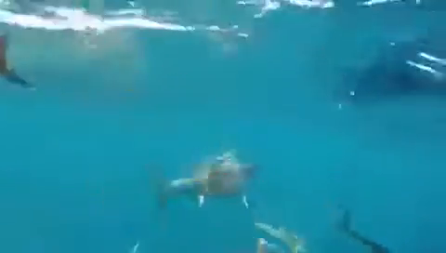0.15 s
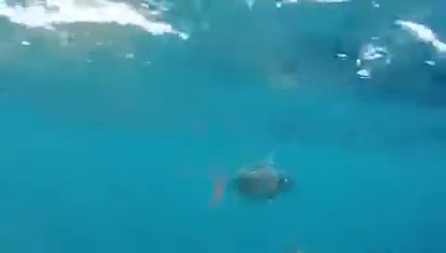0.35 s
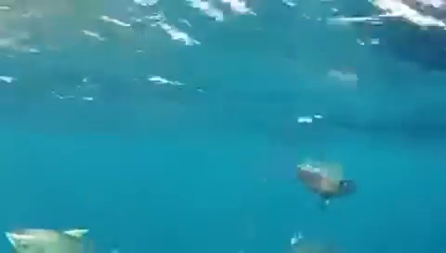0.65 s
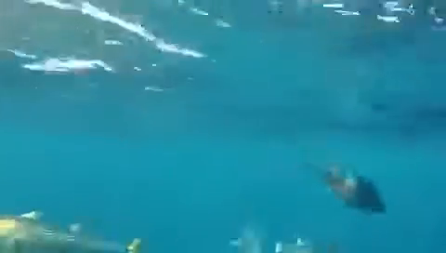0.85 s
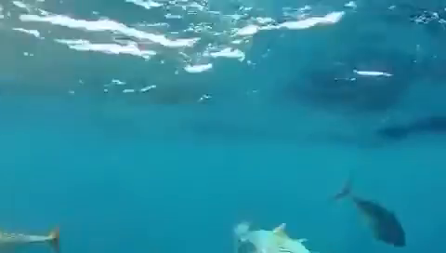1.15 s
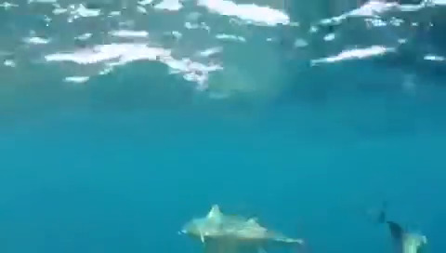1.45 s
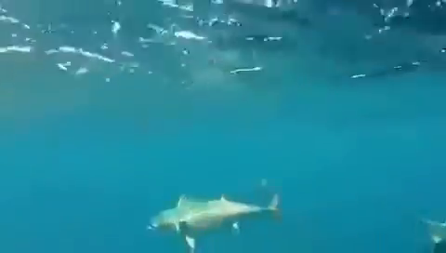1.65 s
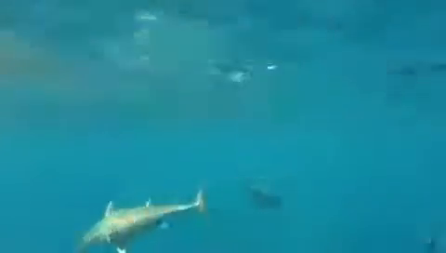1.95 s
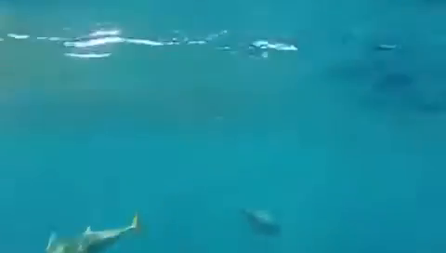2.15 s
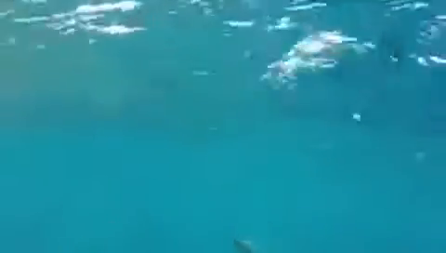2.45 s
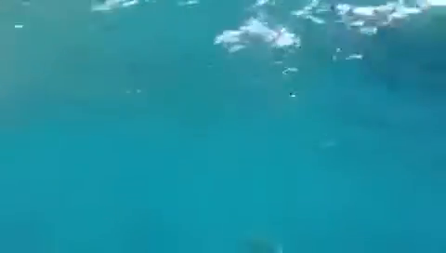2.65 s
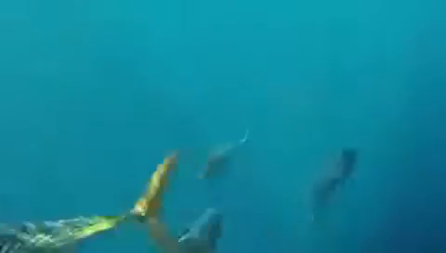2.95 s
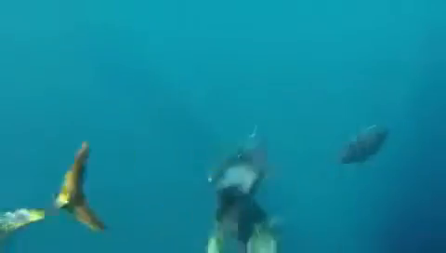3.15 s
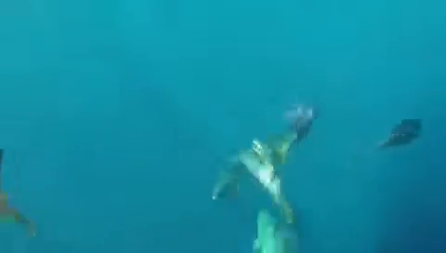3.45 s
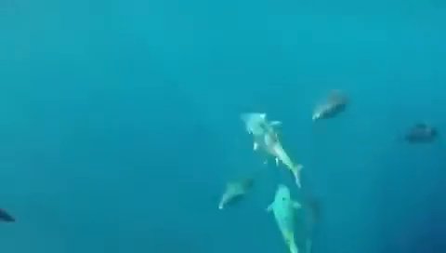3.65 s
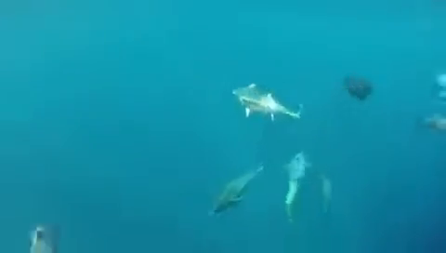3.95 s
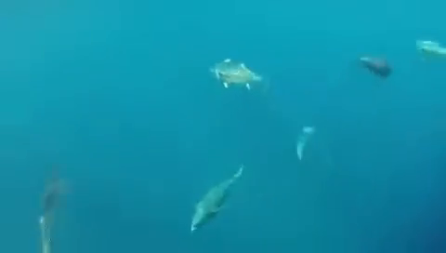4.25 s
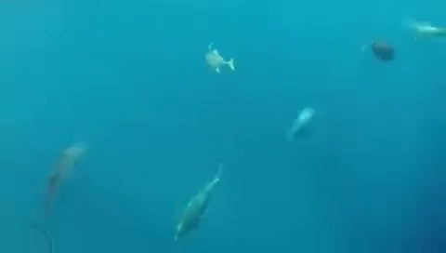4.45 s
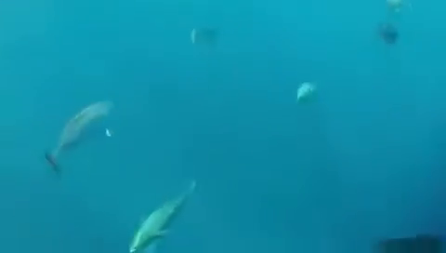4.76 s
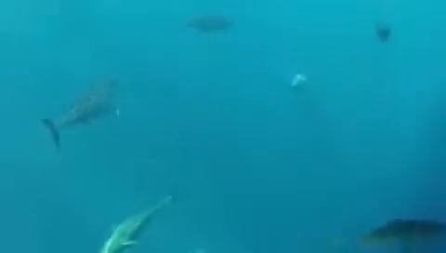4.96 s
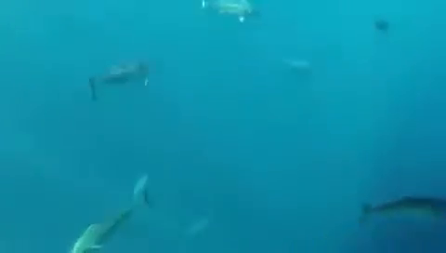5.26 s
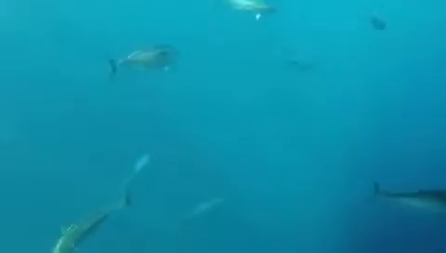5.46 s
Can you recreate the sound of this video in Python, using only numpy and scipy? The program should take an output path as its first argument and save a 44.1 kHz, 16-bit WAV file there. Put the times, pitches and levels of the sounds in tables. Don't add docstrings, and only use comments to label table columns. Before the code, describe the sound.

Underwater, a diesel boat engine drones and throbs with hissing propeller wash, knocks hit the camera housing, then the drone jumps louder and closer.

```python
import sys
import numpy as np
from scipy import signal
from scipy.fft import rfft, irfft
from scipy.io import wavfile
from scipy.ndimage import uniform_filter1d

SR = 44100
rng = np.random.default_rng(int(sys.argv[2]) if len(sys.argv) > 2 else 0)


def generate_wav(sig):
    pcm = np.round(np.clip(np.atleast_2d(sig).T, -1, 1) * 32767).astype(np.int16)
    wavfile.write(sys.argv[1], SR, pcm)


def to_linear_factor(level_db):
    exponent = np.asarray(level_db, float) / 20
    return 10 ** exponent


N = 246959
RECORDER_HZ = 12000
M = N * RECORDER_HZ // SR + 1
CUT_S, FADE_OUT_S, FADE_IN_S = 3.011, 0.12, 0.087
CYCLE_HZ = 25.823
TICK_HZ, TICK_MS, SNAP_HZ, SNAP_MS, CLICK_SCATTER = 5160, 1.3, 4150, .35, .022

ZONE_HZ = [140, 390, 720, 980]
ZONE_DB = [(-49, -48, -48, -53), (-41, -35, -41.5, -48)]
ZONE_FOLLOW = [(.3, 1.05, 0.56, 0.62), (.4, 1.1, 0.92, 0.066)]
# time in seconds, level in dB.
NEAR = [
    [(.02, -51), (.3, -48.5), (.6, -47.5), (1.05, -47.5), (1.55, -49.5), (2.05, -51.5), (2.4, -52.5),
     (2.65, -49), (2.9, -46)],
    [(3.12, -40.5), (3.4, -40), (3.8, -38), (4.15, -36), (4.4, -34), (4.7, -33.5), (5.0, -33), (5.3, -31.5),
     (5.58, -32)],
]

# frequency in Hz, density in dB per Hz.
FIZZ = [(3900, -8.5), (4400, -5.5), (5200, -5), (5600, -6.5), (5990, -12)]
FLOW_DB = (-70.5, -61)
# time in seconds, rise over calm in dB, half length in seconds.
SURGES = [
    (.22, 7, 0.074),
    (.63, 7, .09),
    (1.18, 9, 0.16),
    (1.7, 10, 0.3),
    (2.0, 4, .06),
    (2.26, 5, .04),
    (2.68, 5, .2),
    (4.68, 6, 0.14),
    (5.1, 9, .13),
    (5.53, 10, 0.079),
]
# start in seconds, level in dB, pitch in Hz, 60 dB decay in seconds, rise in seconds.
KNOCKS = [(1.071, -31, 360, 0.05, 0.0031), (1.098, -31, 174, 0.074, 0.0047),
          (1.099, -30.5, 363, 0.11, .004), (1.100, -39, 55, .12, 0.0067),
          (1.110, -31.5, 365, 0.041, 0.0028), (1.12, -31, 110, 0.03, 0.0025), (1.102, -38, 603, .05, .003),
          (1.108, -45, 1300, .04, .003), (1.128, -31, 415, 0.034, 0.0031), (1.132, -43, 186, 0.067, 0.0023),
          (2.4465, -26, 646, 0.016, 0.0013), (2.448, -35.5, 1016, 0.035, .002),
          (2.452, -43, 1280, 0.037, 0.004), (2.472, -42, 2850, 0.023, .003),
          (2.556, -36, 1670, 0.024, 0.0013), (2.557, -32.5, 1333, 0.055, 0.0022),
          (3.716, -42, 2870, .03, .002), (4.195, -37, 1650, 0.05, 0.0032)]
# time in seconds, peak in dB.
TICKS = [(1.3478, -53), (1.672, -59), (1.6844, -63), (1.701, -63), (1.717, -51.5), (1.721, -57),
         (1.7264, -63), (1.7459, -62), (1.7724, -53), (1.8008, -66), (1.81, -60), (1.8204, -63),
         (1.9036, -66), (1.9116, -65), (1.92, -66), (1.9264, -66)]
# time in seconds, peak in dB.
SNAPS = [(0.3224, -71), (1.3114, -66), (1.3658, -52), (1.4127, -70), (1.4471, -66.5), (2.0642, -62),
         (2.3134, -62), (2.4154, -63.5), (2.4643, -69), (3.1544, -69), (3.455, -63), (3.5014, -69),
         (3.885, -57), (3.8964, -64), (3.913, -56), (3.9344, -72), (4.1784, -62), (4.43, -65)]

# frequency in Hz, density in dB per Hz.
WASH_LOW = [(41, -33), (70, -13.5), (113, 0.5), (232, -3.5), (269, -6), (315, -2), (354, -5), (424, -3.5),
            (552, -4), (620, 2), (775, -3.5), (880, -23.5), (1140, -45), (1940, -120)]
# frequency in Hz, density in dB per Hz.
WASH_HIGH = [
    [(2300, -5), (2540, -19), (2680, 0), (2800, -3.5), (2980, 0), (3200, -5.5), (3600, -10.5), (3740, -20),
     (3830, -2), (3930, -1), (4010, -7.5), (4120, -9.5), (4400, -22), (5000, -39)],
    [(1480, -32), (2520, -2), (3000, 0), (3490, -12.5), (3870, -6.5), (4370, -20.5), (4600, -20.5),
     (5980, -52), (10100, -120)],
]
# frequency in Hz, density in dB per Hz.
GEAR = [
    [(520, -46), (880, -9.5), (1060, -10.5), (1100, -17.5), (1110, -14), (1190, -23), (1250, -8),
     (1340, -2), (1420, -4.5), (1570, -13.5), (1730, -13.5), (1840, -1), (1920, -0.5), (2000, -5),
     (2520, -19), (3280, -56), (5540, -120)],
    [(520, -33), (880, -3.5), (924, -7), (974, -8.5), (1000, -5.5), (1060, -3.5), (1110, -15.5),
     (1160, -16.5), (1350, 4), (1700, -11.5), (1870, 4), (2030, -10), (2220, -8.5), (2300, -15),
     (2520, -20), (3280, -48), (5540, -120)],
]
# gearbox level in dB, treble level in dB, both above the low wash.
WASH_DB = [(-0.5, -12), (-3.5, -14)]

ORDER_DB = [
    [-13, -14, -15, -5, -9, -20.5, -7, -6, -17, -9.5, -1.5, -7, -3.5, 0, -8.5, -3.5, -5, -17, -8, -17, -14,
     -16.5, -9, -2, -10, -8.5, -4, -8.5, -25, -7, -12, -18, -20],
    [-17, -24, -27, -1, -6, -13.5, -10, -3, -11.5, -5, -2.5, -14, -6, 0.0025, -9.5, -1, -13, -14, -17,
     -11.5, -26, -16, -16.5, -2.5, -18.5, -11.5, -14.5, -11.5, -16, -5.5, -14.5, -16.5, -19],
]
TOP_ORDER_DB = (-53.5, -42.5)
LEAD_ORDERS = (4, 5, 8, 30, 28, 40, 73)
LEAD_DB = [(-58.5, -63, -58, -59, -68, -70.5, -65), (-48, -48, -51.5, -48, -56.5, -61.5, -65)]
# time in seconds, multiple, change in dB, half length in seconds.
SWELLS = [(0.87, 28, 13, .28), (.64, 4, 5, 0.22), (2.02, 4, -6, .2), (2.64, 4, -13, .12), (4.4, 4, 5, .2),
          (4.887, 4, 7.5, .11), (2.55, 28, 8, .12), (1.23, 5, -8, 0.13), (2.2, 5, 6.5, 0.18),
          (3.14, 5, -10, .11), (4.5, 5, -11.5, .16), (5.17, 40, 5.5, .4), (0.66, 73, 9, 0.35),
          (5.11, 5, -4, .12), (5.55, 5, 4, .14), (.05, 8, -15, 0.11), (0.98, 8, 4, 0.1), (1.7, 8, -11, 0.1),
          (2.1, 8, -5, 0.18), (2.64, 8, -12, 0.14), (3.55, 8, -11, .15), (4.42, 8, 13.5, 0.089),
          (4.9, 8, 14, 0.13), (5.45, 8, 11.5, 0.2), (0.54, 30, -11, .16), (1.23, 30, -6, 0.11),
          (2.66, 30, 4.5, 0.12), (3.82, 30, 4.5, 0.13), (4.58, 30, -18.5, 0.17), (5.33, 30, -8, 0.099)]
# frequency in Hz, level in dB.
GEAR_LINES = [
    [(1034, -71.5), (1061, -69.5), (1367, -66), (1884, -60.5), (1911, -65.5), (1965, -66), (2040, -69),
     (2143, -72), (2169, -71)],
    [(1034, -60.5), (1061, -64), (1367, -62), (1879, -59), (1911, -60), (1986, -66), (2040, -63.5),
     (2143, -64.5), (2196, -66.5)],
]
GEAR_TOP_DB = (-69.5, -68.0)


def colour(points, hz):
    f, db = np.transpose(points)
    return np.interp(np.log(hz + 1e-9), np.log(f), db, -80, -80)


def noise(gain):
    f = np.fft.rfftfreq(M, 1 / RECORDER_HZ)
    x = irfft(rfft(rng.standard_normal(M)) * gain(f), M)
    return x / x.std()


def walk(rate):
    k = int(RECORDER_HZ / rate)
    steps = np.repeat(rng.standard_normal(M // k + 1), k)
    return 1.315 * uniform_filter1d(uniform_filter1d(steps, k), k)[:M]


def by_shot(pair, t):
    first, second = np.asarray(pair, float)[..., None]
    return np.where(t < CUT_S, first, second)


def bumps(rows, t):
    total = 0
    for s, db, half in rows:
        same_shot = (t < CUT_S) == (s < CUT_S)
        total = total + db * np.exp(-.5 * ((t - s) / half) ** 2) * same_shot
    return total


def hull(t):
    first, second = (np.interp(t, *np.transpose(rows)) for rows in NEAR)
    mean_db = [np.mean(rows, axis=0)[1] for rows in NEAR]
    near_db = np.where(t < CUT_S, first, second) - by_shot(mean_db, t)
    return by_shot(ZONE_DB, t) + by_shot(ZONE_FOLLOW, t) * near_db


def heard(zones_db, hz):
    place = np.interp(np.log(hz), np.log(ZONE_HZ), np.arange(4))
    k = min(int(place), 2)
    return (k + 1 - place) * zones_db[k] + (place - k) * zones_db[k + 1]


def fizz():
    return to_linear_factor(-78.0 + 1.7 * walk(18)) * noise(lambda f: to_linear_factor(colour(FIZZ, f)))


def flow(t):
    rumble = noise(lambda f: (f / 24) ** 2 / (1 + (f / 24) ** 3.1) / (1 + (f / 85) ** 6))
    return rumble * to_linear_factor(by_shot(FLOW_DB, t) + bumps(SURGES, t) + 1.5)


def knock(out, s, db, hz, t60, rise):
    t = np.arange(int(t60 * RECORDER_HZ)) / RECORDER_HZ
    onset = np.sin(np.pi / 2 * np.clip(t / rise, 0, 1)) ** 2
    ring = -to_linear_factor(db - 60 * t / t60) * onset * np.sin(2 * np.pi * hz * t)
    i = int(s * RECORDER_HZ)
    out[i:i + len(t)] += ring


def housing():
    out = np.zeros(M + RECORDER_HZ)
    for row in KNOCKS:
        knock(out, *row)
    t = np.arange(-60, 60) / RECORDER_HZ
    clicks = [(*row, TICK_HZ, TICK_MS) for row in TICKS]
    clicks += [(*row, SNAP_HZ, SNAP_MS) for row in SNAPS]
    for (s, db, hz, ms), stray in zip(clicks, rng.standard_normal(len(clicks))):
        hz = hz * (1 + CLICK_SCATTER * stray)
        tick = to_linear_factor(db - 1.0) * np.exp(-.5 * (t * 1000 / ms) ** 2) * np.sin(2 * np.pi * hz * t)
        snap = to_linear_factor(db + 2.0) * np.exp(-.5 * (t / 0.00023) ** 2) * np.sin(2 * np.pi * 4100 * t)
        i = int((s + .002) * RECORDER_HZ)
        out[i - 60:i + 60] += tick + snap
    return out[:M]


def wash(t, phase, zones_db):
    out, swell, rattle = 0, walk(3.38), walk(25)
    throb = np.cos(2 * phase) + 0.63 * np.cos(phase)
    f = np.fft.rfftfreq(M, 1 / RECORDER_HZ)
    spectra = []
    for gear, treble, (gear_db, treble_db) in zip(GEAR, WASH_HIGH, WASH_DB):
        low = to_linear_factor(colour(WASH_LOW, f))
        spectra.append(low + to_linear_factor(colour(gear, f) + gear_db) + to_linear_factor(colour(treble, f) + treble_db))
    for hz in 80 * 2 ** (np.arange(19) / 3):
        share = np.clip(1 - np.abs(3 * np.log2((f + 1e-9) / hz)), 0, 1) ** .5
        early, later = irfft(rfft(rng.standard_normal(M)) * share * np.array(spectra), M)
        high = min(hz / 2500, 1)
        db = heard(zones_db, hz) + 0.71 * swell + (1.0 + 0.45 * high) * walk(12)
        db = db + high * (0.97 * throb + 0.67 * rattle)
        out = out + to_linear_factor(db + 8.0) * np.where(t < CUT_S, early, later)
    return out


def crank():
    return 2 * np.pi * np.cumsum(CYCLE_HZ * (1 + .0006 * walk(4))) / RECORDER_HZ


def engine(t, phase, zones_db):
    leads_db = by_shot(LEAD_DB, t)
    late = t >= CUT_S
    early_mean, late_mean = (zones_db[:, part].mean(1)[:, None] for part in (~late, late))
    drift_db = zones_db - np.where(late, late_mean, early_mean)
    gears = [{round(hz / CYCLE_HZ): db for hz, db in lines} for lines in GEAR_LINES]
    out = np.zeros(M)
    for k in range(3, 96):
        hz, slow, quick, sway = k * CYCLE_HZ, walk(2.976), walk(11), walk(5)
        scatter, stray = rng.standard_normal(2)
        if k in LEAD_ORDERS:
            swells = [(s, db, half) for s, order, db, half in SWELLS if round(order) == k]
            db = leads_db[LEAD_ORDERS.index(k)] + bumps(swells, t) + 3.0 + 1.0 * quick
        elif k <= len(ORDER_DB[0]):
            below_db = by_shot([row[k - 1] for row in ORDER_DB], t)
            db = below_db + by_shot(TOP_ORDER_DB, t) + 2.5 + heard(drift_db, hz)
            db = db + np.clip(.9 - 0.18 * below_db, 0, 3.2) * slow + 1.4 * quick
        else:
            tones_db = [gear.get(k, colour(shape, hz) + top_db + 2.1 * scatter) + 3.0
                        for gear, shape, top_db in zip(gears, GEAR, GEAR_TOP_DB)]
            depth_db = 1.8 if k in gears[1] else 2.8
            db = by_shot(tones_db, t) + heard(drift_db, hz) + depth_db * slow + 1.8 * quick
        start = (np.pi / 2 - .036) * k * k + 1.1 * stray
        out += to_linear_factor(db) * np.sin(k * phase + start + (0.23 + 0.00013 * k * k) * sway)
    return out


def scene():
    t = np.arange(M) / RECORDER_HZ
    zones_db = hull(t)
    phase = crank()
    near_sounds = fizz() + flow(t) + housing()
    ship = wash(t, phase, zones_db) + engine(t, phase, zones_db)
    fade = np.clip(np.maximum((CUT_S - t) / FADE_OUT_S, (t - CUT_S) / FADE_IN_S), .03, 1)
    sea = fade * (near_sounds + ship)
    sea = np.pad(sea, (0, 200), mode="reflect", reflect_type="odd")
    return signal.resample_poly(sea, 147, 40, window=("kaiser", 9.))[None, :N]


def low_pass(x):
    return signal.sosfilt(signal.butter(12, 15130, fs=SR, output="sos"), x)


def record(dry):
    dry = np.pad(dry, ((0, 0), (0, 588)), mode="reflect", reflect_type="odd")
    coarse = signal.resample_poly(dry, 40, 147, axis=1, window=("kaiser", 9.))
    held = signal.resample_poly(np.repeat(coarse, 4, axis=1), 147, 160, axis=1)[:, :N]
    held = held * np.clip(np.arange(N, 0, -1) / 60, 0, 1)
    return low_pass(held)


dry = scene()
out = record(dry)
generate_wav(out)
```